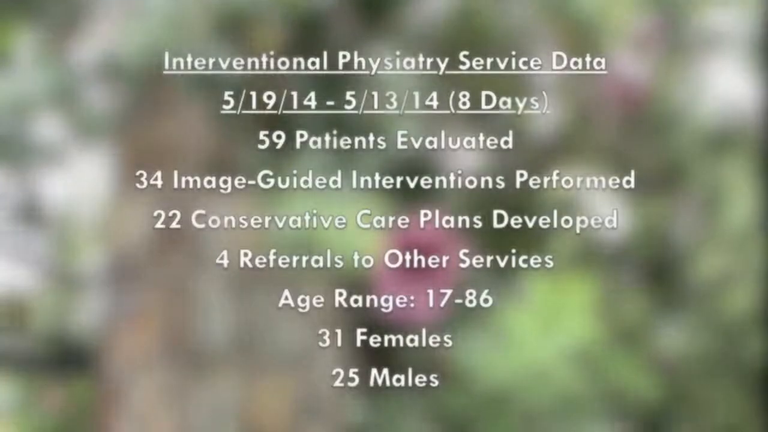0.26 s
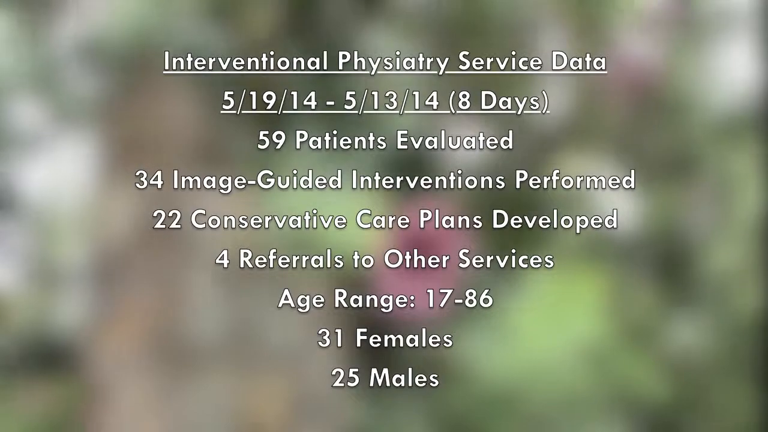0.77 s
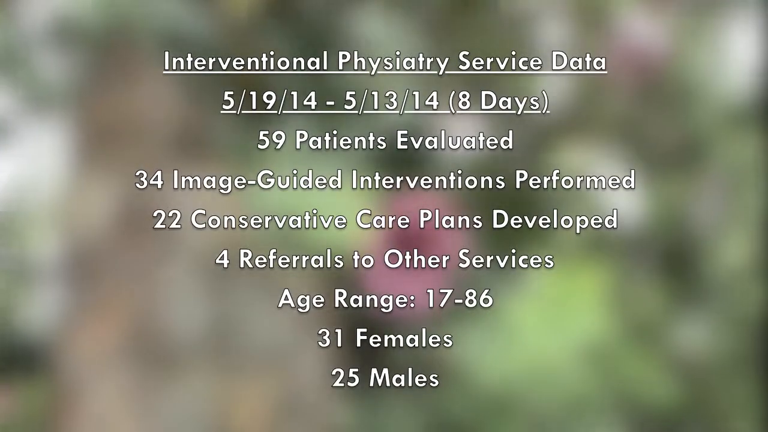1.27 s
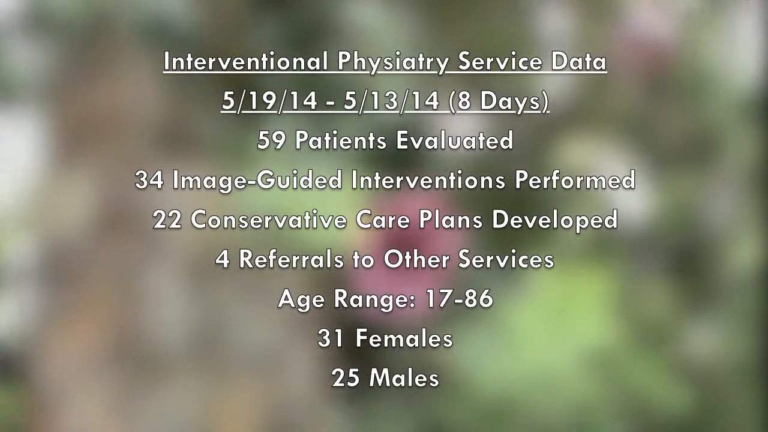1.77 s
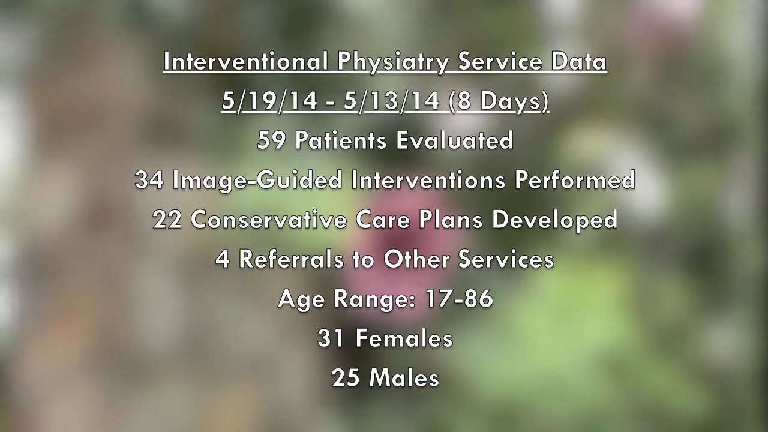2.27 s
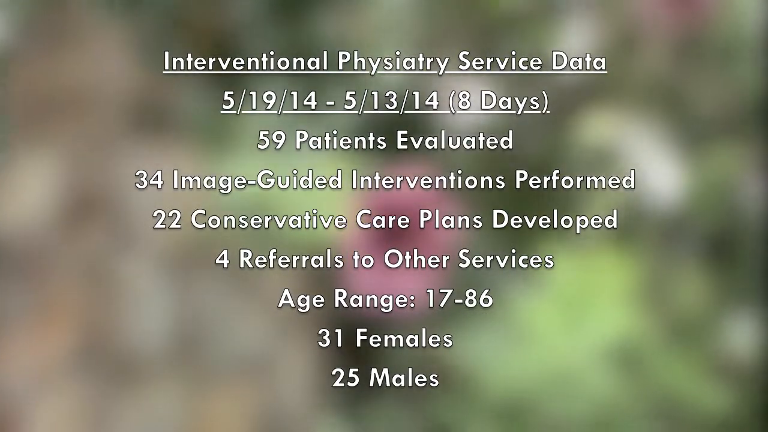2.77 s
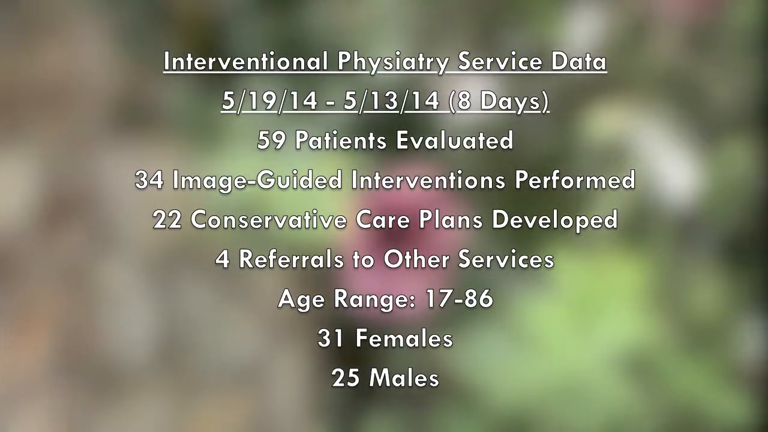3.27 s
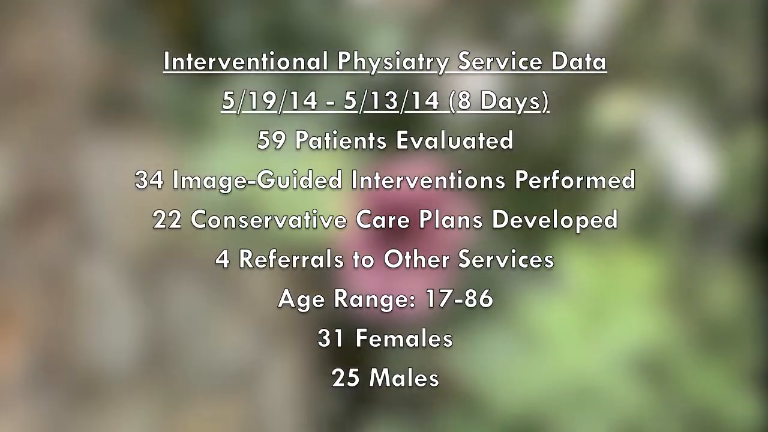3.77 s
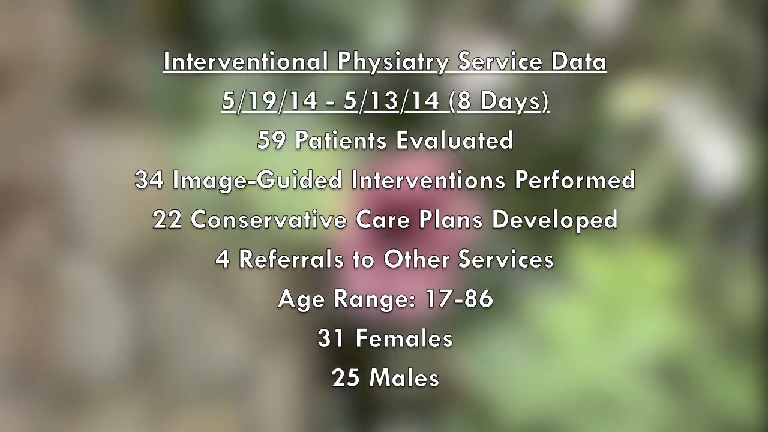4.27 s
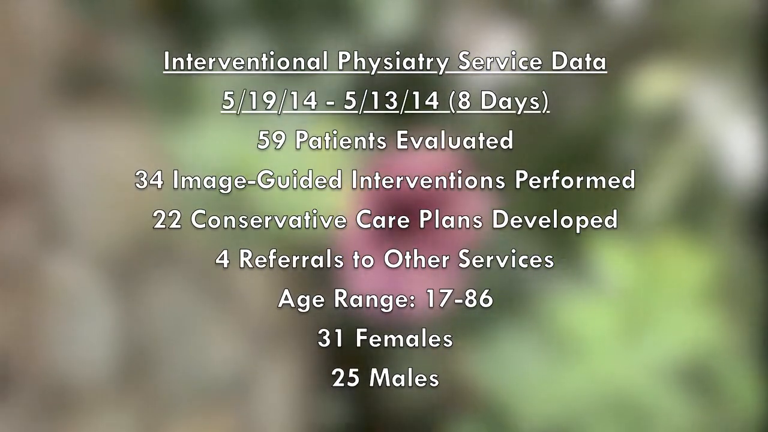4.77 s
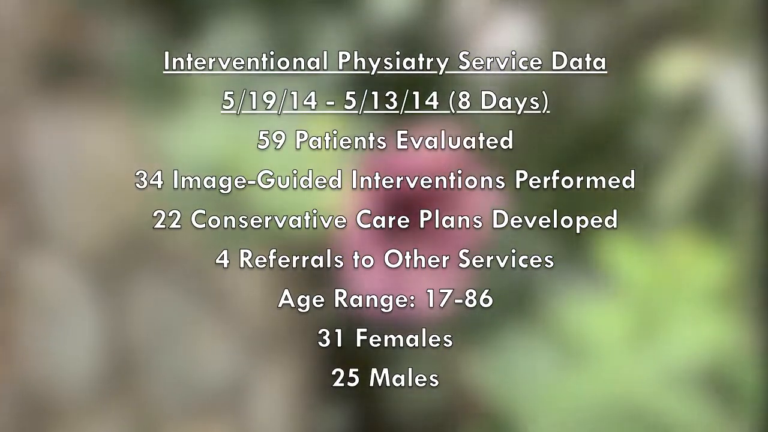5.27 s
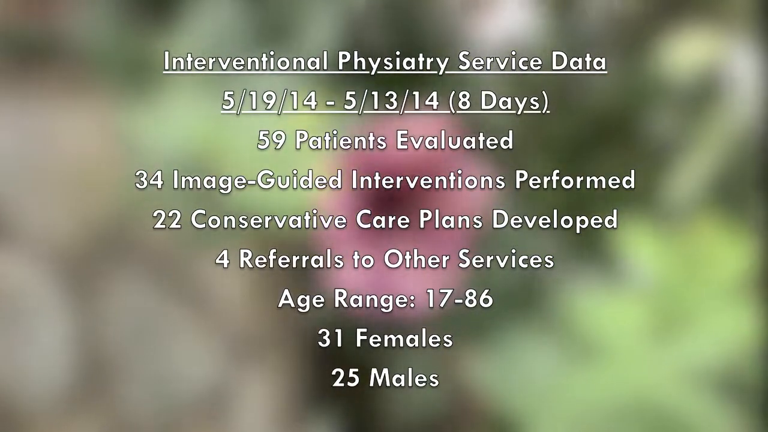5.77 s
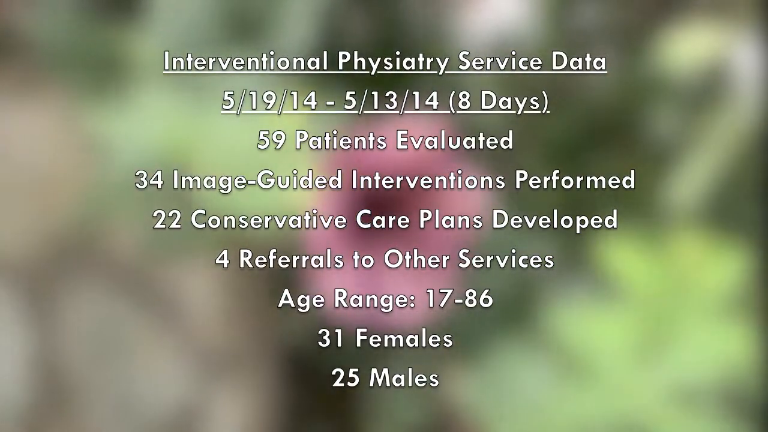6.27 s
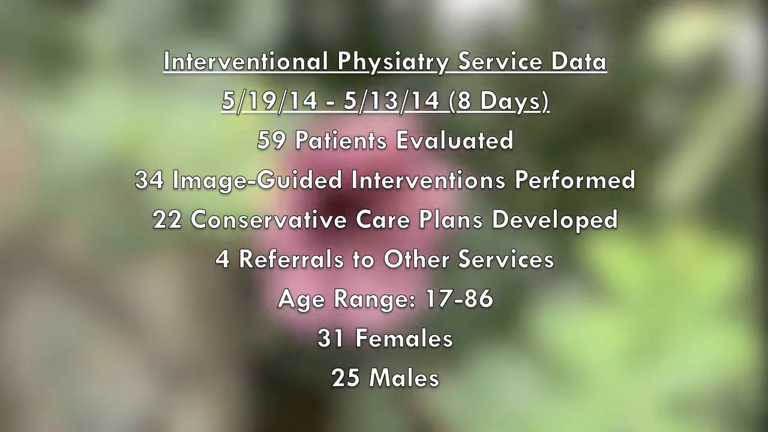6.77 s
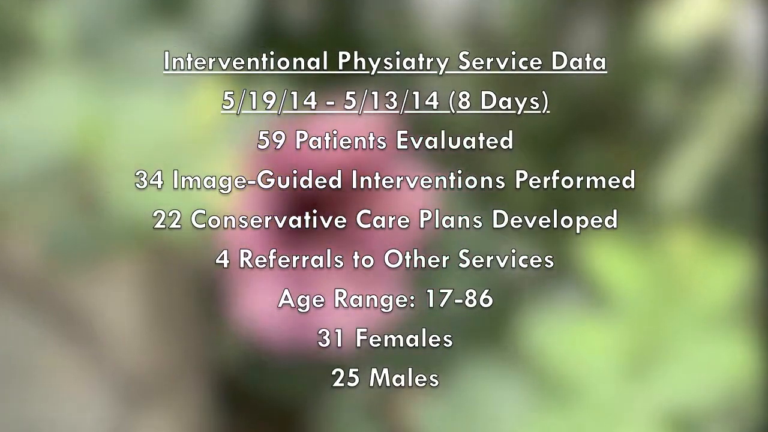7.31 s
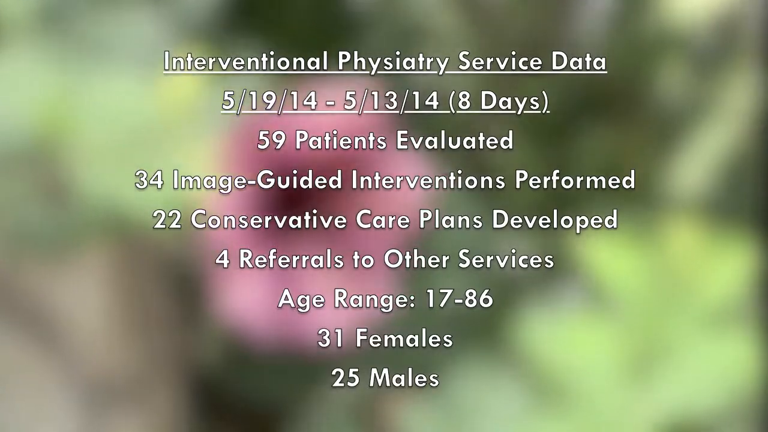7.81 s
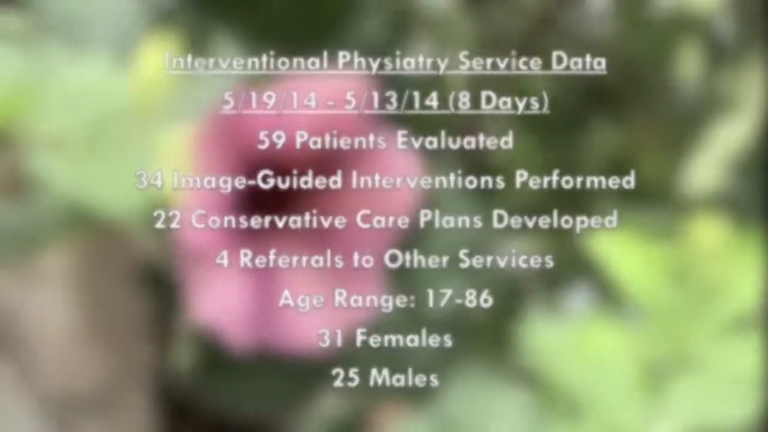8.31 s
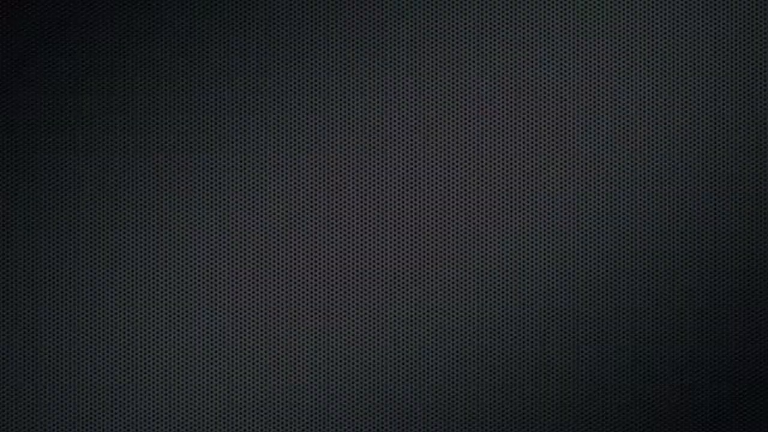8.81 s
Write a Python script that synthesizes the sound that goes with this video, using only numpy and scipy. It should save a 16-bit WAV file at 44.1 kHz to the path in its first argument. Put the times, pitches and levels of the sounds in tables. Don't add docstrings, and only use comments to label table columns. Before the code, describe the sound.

In a hot garden, a dense cicada chorus makes a bright continuous hiss, slightly right of centre. A bush cricket rasps with a fast throb, and tree crickets chirp thin, even, near-pure notes with a light leafy echo. Distant traffic hums very faintly. Close to a small stereo microphone, occasional soft steps and bumps thud; near the end a few plastic button ticks sound, then everything fades in a tenth of a second.

```python
import sys
import numpy as np
from scipy import signal
from scipy.fft import rfft, irfft
from scipy.io import wavfile
from scipy.ndimage import uniform_filter1d

SR = 44100
rng = np.random.default_rng(int(sys.argv[2]) if len(sys.argv) > 2 else 0)


def store_wav(level_fs):
    pcm = np.round(np.clip(np.atleast_2d(level_fs), -1, 1) * 32767)
    wavfile.write(sys.argv[1], SR, pcm.T.astype(np.int16))


def ratio(d):
    e = np.asarray(d, float) / 20
    return 10 ** e


N = 399105
TIME = np.arange(N) / SR


def unit(x):
    return x / np.sqrt(np.mean(x ** 2))


def curve(table):
    return ratio(np.interp(TIME, *np.transpose(table)))


def colour(x, *spectra):
    log_hz = np.log(np.arange(N // 2 + 1) * SR / N + 1)
    db = 0
    for spectrum in spectra:
        hz, level_db = np.transpose(spectrum)
        db = db + np.interp(log_hz, np.log(hz), level_db)
    return irfft(rfft(x) * ratio(db), N)


def walk(rate_hz):
    hold = int(SR / rate_hz)
    steps = np.repeat(rng.standard_normal(N // hold + 1), hold)
    slewed = uniform_filter1d(uniform_filter1d(steps, hold), hold)
    return unit(slewed[:N])


def add(out, start_s, sound):
    i = int(start_s * SR)
    out[..., i:i + sound.shape[-1]] += sound


def swells(base_db, table, width_s):
    rise_db = sum(db * np.exp(-((TIME - s) / width_s) ** 2) for s, db in table)
    return ratio(base_db + rise_db)


# frequency in Hz, level in dB per Hz.
CICADA_SPECTRUM = [(2000, -29.5), (3400, -24.5), (4110, -19), (4740, -3.5), (5050, 1), (5560, -4),
                   (6200, 1.5), (6700, 0.5), (7820, -2.5), (8500, -0.5), (9060, -4.5), (9740, -13),
                   (10400, -36.5), (11500, -45)]
# time in seconds, level in dB.
CICADA_LEVEL = [
    (0.0, -36.5),
    (0.65, -35.5),
    (7.39, -34.5),
    (7.88, -34),
    (8.7, -35),
]
# frequency in Hz, level in dB against the direct sound.
LEAF_SCATTER = [(3500, -3), (4800, -6), (5600, -12), (7000, -10.5), (9000, -9.5), (10500, -19.5)]
# frequency in Hz, left minus right in dB.
CICADA_BALANCE = [(3500, -1), (5000, -3), (7000, -2), (9000, -1), (10500, 3)]


def cicadas():
    clicks = 1.21 * rng.standard_normal(N)
    for rate, start in rng.random((40, 2)):
        drum_hz = 220 + 260 * rate
        at = (np.arange(N // 80) + start) * SR / drum_hz
        jitter, size = rng.standard_normal((2, len(at)))
        clicks[(at + 6 * jitter).astype(int) % N] += ratio(1.4 * size)
    clicks = unit(clicks) * ratio(.5 * walk(5.2))
    half = np.array(CICADA_BALANCE) * [1, .5]
    left = colour(clicks, CICADA_SPECTRUM, half)
    right = colour(clicks, CICADA_SPECTRUM, half * [1, -1])
    leaves = [colour(rng.standard_normal(N), CICADA_SPECTRUM, LEAF_SCATTER) for _ in range(2)]
    chorus = np.array([left, right]) + leaves
    treble = colour(chorus, [(9000, -63.5), (9500, 0.5)])
    waver = ratio(3.0 * walk(9))
    return unit(chorus + (waver - 1) * treble) * curve(CICADA_LEVEL)


def bush_cricket(throb_hz=12.1, depth=0.39, level_db=-47):
    wing = [(7900, -39), (8400, -11.5), (8650, -8), (8730, -3.0), (8830, -7.0), (9300, -34.0)]
    drifting_hz = throb_hz * (1 + 0.049 * walk(0.99))
    swell = 1 + depth * np.sin(2 * np.pi * np.cumsum(drifting_hz) / SR)
    rasp = unit(colour(rng.standard_normal(N), wing))
    return ratio(level_db) * swell * rasp * ratio([[-.7], [.7]])


# strong wing stroke in seconds, level in dB.
NEAR_CHIRPS = [(0.168, -47), (0.269, -45.5), (0.498, -46), (0.584, -44), (0.761, -43), (1.126, -45.5),
               (1.487, -43.5), (1.583, -46.5), (2.066, -44.5), (2.237, -45), (2.692, -45), (2.84, -47.5),
               (3.236, -46.5), (4.055, -46.5), (4.223, -46.5), (7.038, -47.5), (7.215, -46), (7.367, -45.5),
               (7.44, -46.5), (7.571, -46.5), (7.727, -44.5), (7.871, -43.5), (8.537, -46.5)]
MID_CHIRPS = [(0.679, -49), (0.856, -48), (0.979, -47.5), (1.239, -47.5), (1.845, -47), (1.927, -48.5),
              (2.325, -46.5), (2.455, -48.5), (2.543, -48.5), (2.95, -47.5), (3.382, -47.5), (3.662, -48.5),
              (3.965, -50.5), (4.344, -49.5), (4.594, -49.5), (5.07, -48), (5.576, -48), (5.859, -46.5),
              (5.985, -47.5), (6.147, -46.5), (6.597, -52.5), (8.034, -49), (8.185, -47)]
FAR_CHIRPS = [(0.093, -50.5), (0.375, -50), (1.399, -50), (1.658, -49), (3.109, -49), (3.525, -51.5),
              (3.811, -50), (4.47, -52.5), (4.68, -53), (4.836, -53), (4.994, -54), (5.148, -50),
              (5.276, -48.5), (5.412, -50), (5.687, -49.5), (6.31, -50), (6.44, -52.5), (6.755, -53),
              (6.914, -53)]
# wing pitch in Hz, stroke before in dB, stroke after in dB.
SINGERS = [
    (2895, -5.5, -11.5),
    (2901, -4, -6.5),
    (2910, -5.5, -3),
]
TRAIL_DB = (-1.5, -7.5, -4.5)


def tree_crickets(stroke_s=0.021, rise_hz=15, glide_hz=45, echo_db=-8, echo_t60_s=0.46, far_db=-64):
    tooth_hz, stroke_gap_s = 2872, .0176
    near, t = np.zeros(N), np.arange(int(stroke_s * SR)) / SR
    shape = np.sin(np.pi * t / stroke_s) ** 1.5
    chirps = []
    for table, voice in zip((NEAR_CHIRPS, MID_CHIRPS, FAR_CHIRPS), SINGERS):
        chirps += [(*row, *voice) for row in table]
    chance = rng.standard_normal((len(chirps), 6, 2))
    for (s, db, hz, before_db, after_db), luck in zip(chirps, chance):
        strokes_db = [before_db, 0, after_db, *(after_db + np.array(TRAIL_DB))]
        for k, (weaker_db, (slip, scatter)) in enumerate(zip(strokes_db, luck)):
            start_s = (k - 1) * stroke_gap_s - stroke_s / 2
            late = k > 1
            phase = 2 * np.pi * (tooth_hz * start_s + (hz + late * rise_hz) * t) + late * 1.2 * slip
            phase = phase + np.pi * glide_hz * (t - stroke_s / 2) ** 2 / stroke_s
            stroke_db = db + 2.5 + weaker_db + (k != 1) * 1.5 * scatter
            add(near, s + start_s, ratio(stroke_db) * shape * np.sin(phase))
    lag_s = np.arange(SR // 3) / SR
    foliage = rng.standard_normal((2, len(lag_s))) * ratio(-60 * lag_s / echo_t60_s) * (lag_s > .006)
    foliage /= np.sqrt(np.sum(foliage ** 2) / 2)
    echo = signal.fftconvolve(near[None], foliage, axes=1)[:, :N]
    far_spectrum = [(2750, -20.5), (2860, 1.5), (2940, -12.5), (3050, -50)]
    far = unit(colour(rng.standard_normal((2, N)), far_spectrum))
    return near * ratio([[-0.8], [0.8]]) + ratio(echo_db) * echo + ratio(far_db) * far


# frequency in Hz, level in dB per Hz.
AIR_SPECTRUM = [(15, -34.5), (25, -5.5), (80, 2.5), (158, -3), (654, -2.5), (2600, -10), (3380, -13),
                (5720, -120)]
# frequency in Hz, side against mid in dB.
AIR_WIDTH = [(25, -32), (60, -35), (110, -24.5), (200, -5.5), (380, -3), (700, -0.5), (2400, -0.9),
             (4000, -20)]
# time in seconds, rise in dB.
BREEZES = [
    (1.4, 1.3),
    (1.96, 0.7),
    (3.5, 0.5),
    (6.7, 2.5),
    (8.3, 1),
]
# time in seconds, rise in dB.
REVS = [
    (0.1, 11),
    (1.1, 6),
    (2.2, 3),
    (5.27, 0),
    (6.58, -2),
    (7.07, 9),
    (7.6, 9.5),
    (8.05, 6),
    (8.46, 6),
]


def air():
    mid, side = rng.standard_normal((2, N)) * ratio(.8 * np.array([walk(9), walk(9)]))
    thin = [(25, -6), (60, -5.0), (110, -3), (150, -1)]
    mid = colour(mid, AIR_SPECTRUM, thin)
    side = colour(side, AIR_SPECTRUM, thin, AIR_WIDTH)
    hum = unit(np.array([mid + side, mid - side])) * ratio(4.0)
    drone = [(35, -29.0), (62, -1), (80, -6), (96, 2.5), (125, -29)]
    engines = unit(colour(rng.standard_normal(N), drone))
    return hum * swells(-59.5, BREEZES, width_s=.25) + engines * swells(-69.5, REVS, width_s=.15)


# frequency in Hz, level in dB per Hz.
HISS_SPECTRUM = [(6000, -60), (9000, -4), (11000, -3), (13500, 0), (16000, 0), (16600, -60)]


def microphone_hiss(level_db=-77):
    hiss = ratio(level_db) * unit(colour(rng.standard_normal(N), HISS_SPECTRUM))
    return hiss * ratio(1.1 * walk(8))


# start in seconds, peak in dB, pitch in Hz, length in ms.
BUMPS = [(0.248, -46, 350, 19), (3.82, -52, 200, 30), (1.48, -47, 150, 18), (1.54, -41, 1600, 4),
         (2.009, -43, 280, 19), (2.012, -44, 650, 8), (2.045, -41, 203, 10), (2.112, -39, 930, 17),
         (4.429, -43, 484, 7.2), (4.43, -46, 1300, 15), (4.939, -46, 123, 27), (5.21, -36.5, 610, 8.7),
         (5.212, -55, 1000, 9), (5.62, -43, 1050, 12), (6.012, -44, 325, 25), (6.011, -35, 850, 5.4),
         (6.099, -49, 370, 18), (6.149, -49.5, 428, 34), (8.001, -46.5, 350, 25), (8.022, -33, 1900, 4.3),
         (8.02, -46, 850, 42), (8.05, -37, 1050, 6), (8.297, -46, 2100, 6)]


def bumps():
    out, t = np.zeros(N), np.arange(SR // 8) / SR
    for s, db, hz, ms in BUMPS:
        body = signal.butter(2, [hz * 0.78, hz * 1.4], "band", fs=SR, output="sos")
        noise = signal.sosfilt(body, rng.standard_normal(len(t) * 2))
        burst = unit(noise[len(t):])
        envelope = (1 - np.exp(-t / 0.0039)) * np.exp(-1000 * t / ms)
        add(out, s, ratio(db - 4.5) * burst * envelope)
    return out


# start in seconds, peak in dB.
TICKS = [
    (8.257, -28),
    (8.3988, -31),
    (8.7183, -31),
]
# frequency in Hz, level in dB, t60 in ms.
CASING = [
    (1000, -6.5, 4.4),
    (2260, 8.5, 1.95),
    (3260, -5, 2.3),
]
# frequency in Hz, level in dB, t60 in ms.
BUTTON = (1890, -3.5, 12.3)


def ticks(rebound_s=.0016, rebound_db=-8):
    out, t = np.zeros(N), np.arange(SR // 40) / SR

    def mode(hz, db, t60_ms):
        onset = 1 - np.exp(-t / 0.000093)
        return -ratio(db - 60000 * t / t60_ms) * np.sin(2 * np.pi * hz * t) * onset

    small = signal.butter(4, 650, "high", fs=SR, output="sos")
    snap = signal.sosfilt(small, sum(mode(*m) for m in CASING))
    rebound = ratio(rebound_db) * snap + mode(*BUTTON)
    for s, db in TICKS:
        add(out, s, ratio(db) * snap)
        add(out, s + rebound_s, ratio(db) * rebound)
    return out


def scene():
    return cicadas() + bush_cricket() + tree_crickets() + air() + bumps() + ticks()


def low_pass(x):
    return signal.sosfilt(signal.butter(12, 15730, fs=SR, output="sos"), x)


def record(dry):
    fade_start_s, fade_end_s = 8.7, 8.795
    fade = np.clip((fade_end_s - TIME) / (fade_end_s - fade_start_s), 0, 1) ** 1.02
    bass_cut = signal.butter(2, 18, "high", fs=SR, output="sos")
    mix = (signal.sosfilt(bass_cut, dry) + microphone_hiss()) * fade
    return low_pass(mix)


dry = scene()
out = record(dry)
store_wav(out)
```